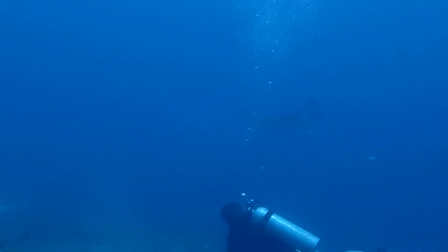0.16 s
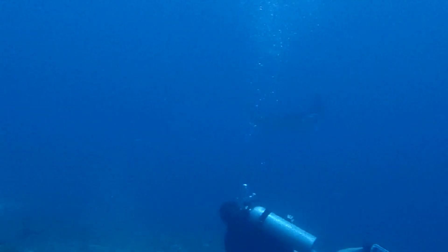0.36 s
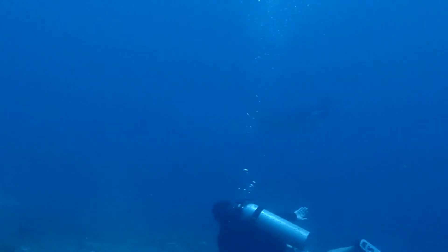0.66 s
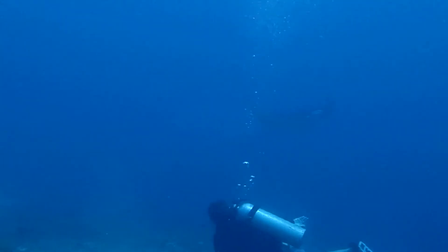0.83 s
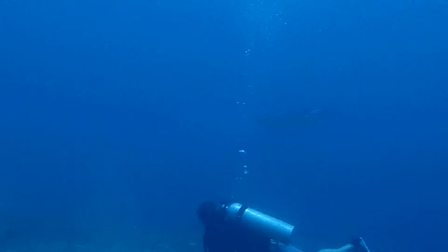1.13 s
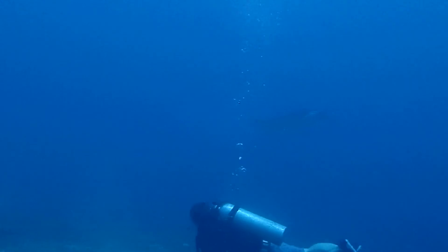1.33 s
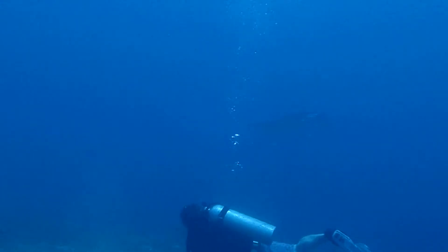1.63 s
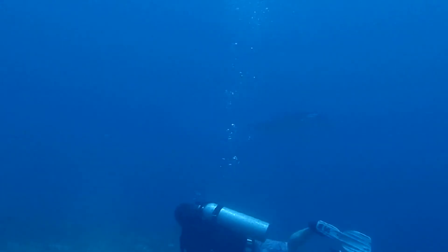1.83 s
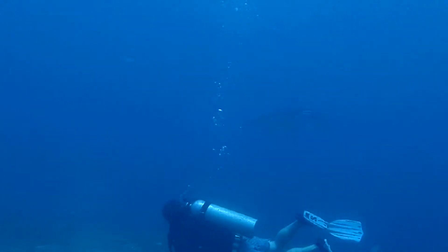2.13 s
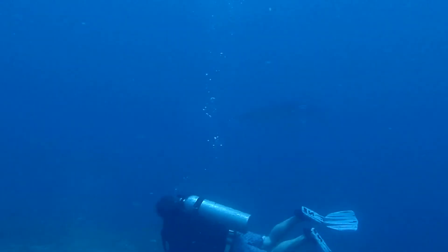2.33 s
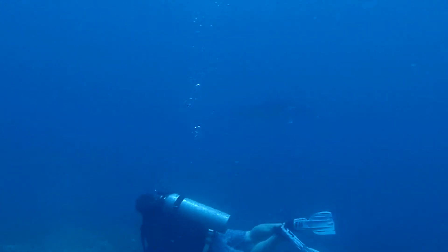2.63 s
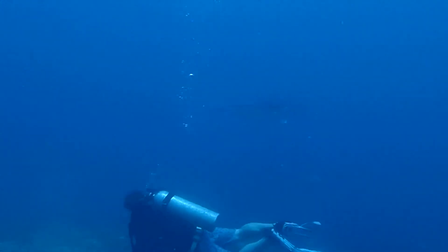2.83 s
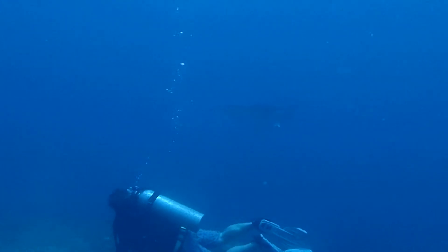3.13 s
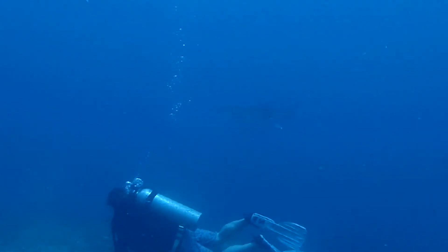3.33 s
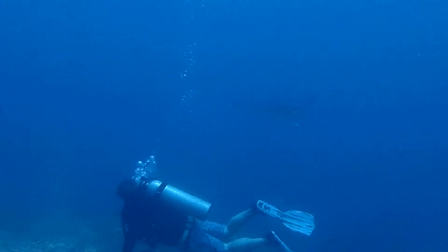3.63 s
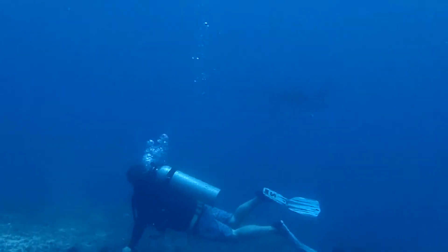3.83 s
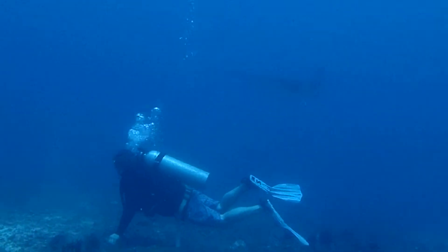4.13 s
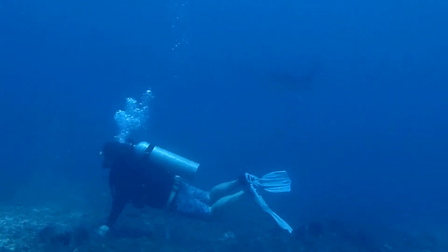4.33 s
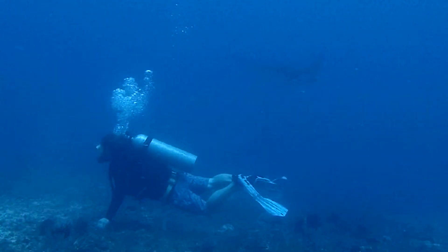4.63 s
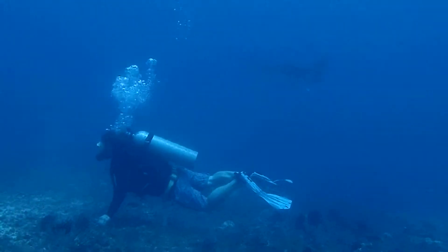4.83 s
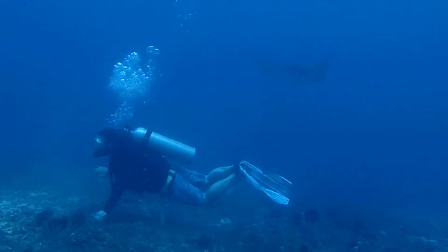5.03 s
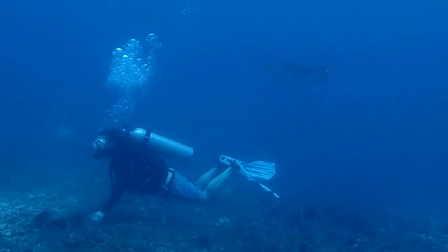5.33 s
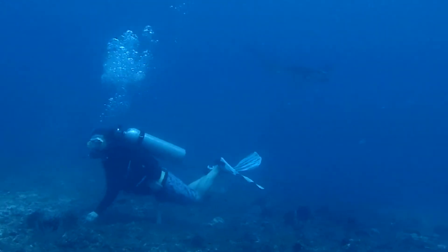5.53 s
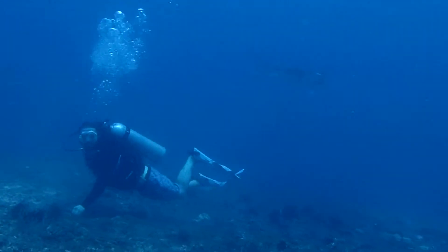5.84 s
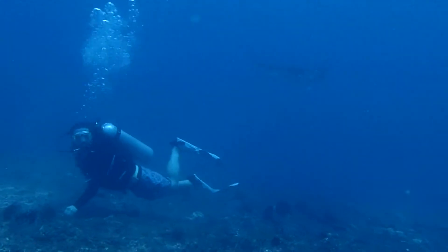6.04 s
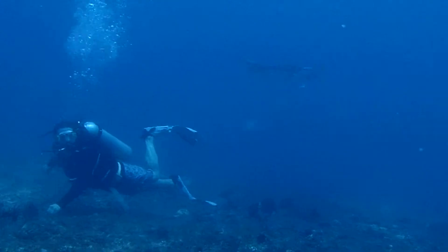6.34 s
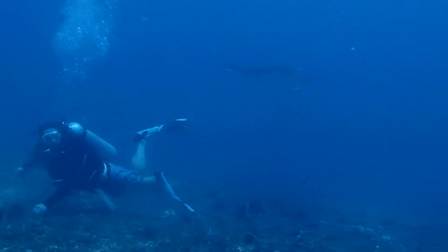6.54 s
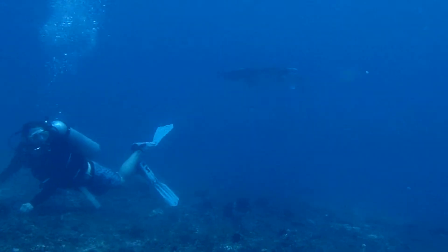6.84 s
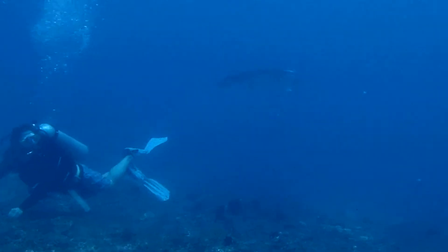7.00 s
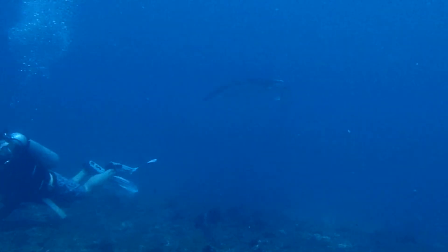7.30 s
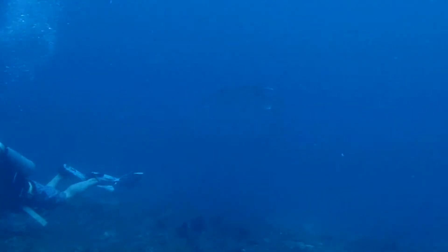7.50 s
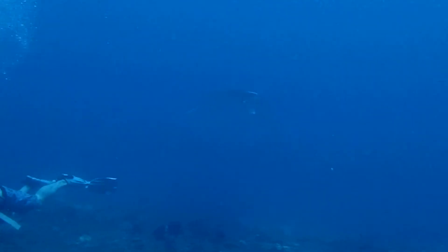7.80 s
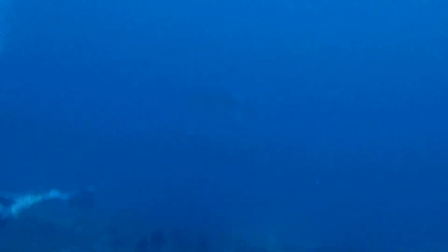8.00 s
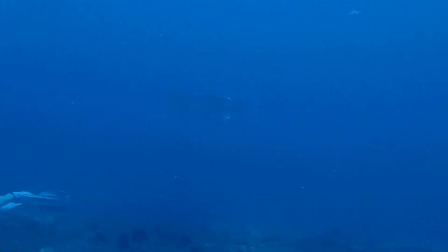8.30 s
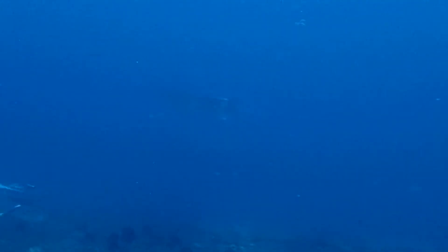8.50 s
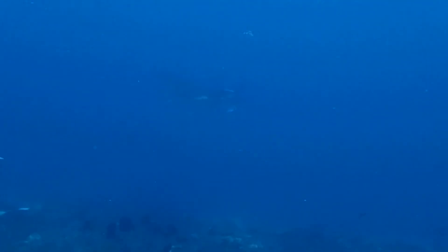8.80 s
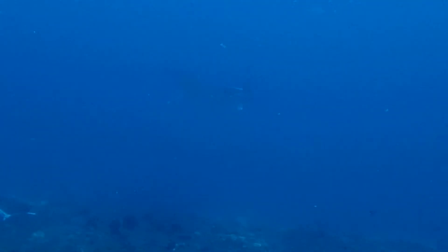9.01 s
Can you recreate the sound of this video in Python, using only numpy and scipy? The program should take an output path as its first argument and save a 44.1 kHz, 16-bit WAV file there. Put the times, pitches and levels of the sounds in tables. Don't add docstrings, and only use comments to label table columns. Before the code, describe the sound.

Underwater in a camera housing, a distant boat engine drones and throbs away, with bubble pings, low bumps, hard knocks on the case and late crackling snaps.

```python
import sys
import numpy as np
from scipy import signal
from scipy.fft import rfft, irfft, next_fast_len
from scipy.io import wavfile
from scipy.ndimage import uniform_filter1d

SR = 44100
rng = np.random.default_rng(int(sys.argv[2]) if len(sys.argv) > 2 else 0)


def transcribe(signal):
    frames = np.atleast_2d(signal).T
    limited = np.clip(frames, -1, 1)
    pcm = np.round(limited * 32767).astype(np.int16)
    wavfile.write(sys.argv[1], SR, pcm)


def decibels_to_gain(level_db):
    exponent = np.asarray(level_db, float) / 20
    return 10 ** exponent


N = 403956

# time in seconds, turns made so far.
SHAFT_TURNS = [(0, .1), (2.8, 46.25), (6.1, 101.18), (6.5, 107.74), (8, 131.92), (9.16, 150.85)]
LOAD_S, LOAD_LENGTH_S = 6.17, 0.64


def evened(x):
    return x / np.sqrt(np.mean(x ** 2) + 1e-20)


def read(points, hz):
    f, value = np.transpose(points)
    return np.interp(np.log(hz + 1), np.log(f + 1), value)


def curve(rows, t):
    s, *columns = np.transpose(rows)
    return np.array([np.interp(t, s, c) for c in columns])


def add(mix, s, sound):
    part = mix[..., round(s * SR):][..., :sound.shape[-1]]
    part += sound[..., :part.shape[-1]]


def ring(db, hz, rise, t60, glide):
    t = np.arange(round((rise + t60) * SR)) / SR
    pitch = hz * glide ** (t / t[-1])
    swell = np.sin(np.pi / 2 * np.minimum(t / rise, 1)) ** 2
    decay = decibels_to_gain(db - 60 * np.maximum(t - rise, 0) / t60)
    return decay * swell * np.sin(2 * np.pi * np.cumsum(pitch) / SR)


def step(t, middle_s, length_s):
    return np.sin(np.pi / 2 * np.clip((t - middle_s) / length_s + .5, 0, 1)) ** 2


def course(rows, t, drift):
    swing = step(t, 3.7, 2.6)
    load = step(t, LOAD_S, LOAD_LENGTH_S)
    return np.array(rows) @ np.array([np.ones(len(t)), drift, swing, load])


def roar(colour_db, patchy_db, size=512):
    # low edge in Hz, high edge in Hz.
    bands = [(100, 250), (350, 600), (900, 1500), (3300, 4600), (5000, 9000)]
    # time in seconds, path loss as a level in dB.
    path = [(0, 1.5), (.3, -4), (.64, -5), (1.15, -5), (1.63, -8), (2.5, -6.5), (3.47, -9), (4.1, -9),
            (5.9, -10), (6.5, -9.5), (7.8, -11.5), (9.16, -12)]
    # start in dB, share of the path loss, dB as the stern swings away, dB under load.
    layers = [
        (-39.5, 0.34, -1.5, -2),
        (-26, 1, 2, 0.5),
        (-39.5, 0.27, -5, 0),
        (-64.5, 0.14, -1, -1),
        (-47.5, 0.32, 0.5, -1.5),
    ]
    hop = size // 4
    hz = np.fft.rfftfreq(size, 1 / SR)
    frames = N // hop + 5
    t = np.arange(frames) * hop / SR

    fine_hz = np.arange(1., SR / 2)
    passed = np.sqrt(housing_power(fine_hz)).mean(axis=0) ** 2 / (SR / 2)
    passed_db = np.array([10 * np.log10(passed[lo:hi].sum()) for lo, hi in bands])
    water_db = course(layers, t, curve(path, t)[0]) - passed_db[:, None]

    centres = np.log([np.sqrt(lo * hi) for lo, hi in bands])
    blend = np.array([np.interp(np.log(hz + 1), centres, row) for row in np.eye(len(bands))])
    patches = uniform_filter1d(rng.standard_normal((frames, len(hz))), 24, 0)
    patches = evened(uniform_filter1d(patches, 8, 1))
    field_db = water_db.T @ blend + colour_db(hz) + patchy_db * patches
    real, imaginary = rng.standard_normal((2, frames, 2, len(hz)))
    spectrum = (real + 1j * imaginary) * decibels_to_gain(field_db)[:, None]
    spectrum = np.transpose(spectrum, (1, 2, 0))
    noise = signal.istft(spectrum, nperseg=size, noverlap=size - hop)[1]
    return noise[:, :N] / np.sqrt(size / 3)


def throb(fade_turns=.2, jitter_turns=.03, uneven_db=2.2):
    t = np.arange(N) / SR
    halves = 2 * curve(SHAFT_TURNS, t)[0]
    which = halves.astype(int)
    luck = rng.standard_normal((int(halves[-1]) + 2, 2))
    since = (halves % 1) / 2 - jitter_turns * abs(luck[which, 1])
    load = step(t, LOAD_S, LOAD_LENGTH_S)
    whole_turn_db = -12 + 9 * load
    half_turn_db = -7.5 + 1 * load
    level_db = np.where(which % 2 == 0, whole_turn_db, half_turn_db) + uneven_db * luck[which, 0]
    return uniform_filter1d(decibels_to_gain(level_db) * np.exp(-since / fade_turns) * (since > 0), size=260)


def hum(waver_db=1.5):
    orders = (8, 10, 27)
    # start in dB, drift in dB a second, dB after the swing, dB under load.
    tones = [
        (-47.5, -1, 10, -12),
        (-49, -.7, -1, -6),
        (-38, -.9, 1.5, -4),
    ]
    t = np.arange(N) / SR
    slow = evened(uniform_filter1d(rng.standard_normal((120, len(orders))), size=3, axis=0))
    waver = curve(np.c_[np.linspace(0, t[-1], len(slow)), slow], t)
    turns = np.outer(orders, curve(SHAFT_TURNS, t)[0])
    level_db = course(tones, t, t) + waver_db * waver
    return np.sqrt(2) * (decibels_to_gain(level_db) * np.sin(2 * np.pi * turns)).sum(axis=0)


def snaps(boost_db=40, treble_db=-7, rise_share=0.043):
    # time in seconds, peak in dB, t60 in seconds.
    large = [(6.336, -50, .03), (6.3737, -36, 0.014), (6.3947, -42, .04), (6.465, -40, 0.038),
             (6.497, -39, .012), (6.517, -44, .045), (6.5816, -35.5, .05), (6.6372, -38.5, 0.067),
             (6.702, -38.5, 0.049), (7.0745, -37, .035), (7.3886, -35, .03), (7.633, -34, 0.028),
             (7.692, -32.5, .035), (7.8123, -39, 0.041), (7.8434, -42, .015), (8.2706, -49, .02),
             (8.368, -41, 0.041), (8.4164, -37, .012), (8.4257, -35, .02), (8.4754, -43, .015),
             (8.489, -35, .03), (8.5, -39, .03), (8.5205, -33, .015), (8.5604, -35, .02),
             (8.585, -34, 0.036), (8.6133, -39, 0.036), (8.9194, -33, .025), (9.1217, -35, 0.023)]
    first_turn, clear_s = 100, .03
    out = np.zeros((2, N))
    t = np.arange(2000) / SR
    body = signal.butter(2, (1500, 7000), "band", fs=SR)
    treble = signal.butter(2, (4900, 10000), "band", fs=SR)

    times, turns = np.transpose(SHAFT_TURNS)
    beats = np.interp(np.arange(first_turn, int(turns[-1])), turns, times)
    late, strength = rng.standard_normal((2, len(beats)))
    small = np.c_[beats + .003 * late, -46 + 3 * strength, np.full(len(beats), .045)]
    clear = abs(beats[:, None] - np.transpose(large)[0]).min(axis=1) > clear_s
    for s, db, t60 in np.vstack([small[clear], large]):
        swell = np.minimum(t / (rise_share * t60), 1)
        puff = rng.standard_normal((2, len(t))) * swell * decibels_to_gain(db + boost_db - 60 * t / t60)
        add(out, s - .001, signal.lfilter(*body, puff) + decibels_to_gain(treble_db) * signal.lfilter(*treble, puff))
    return out


def knocks():
    # time in seconds, peak in dB, main ring in Hz, ring t60 in seconds, treble tick in dB.
    blows = [
        (2.288, -14, 1170, 0.032, -17),
        (2.376, -14, 1135, 0.02, -27),
        (7.571, -12.5, 1150, 0.02, -26),
        (8.013, -.5, 1085, 0.015, -24.5),
    ]
    # ratio to the main ring, level in dB.
    modes = [(.86, -7), (1, 4), (1.28, -9), (1.55, -10), (1.8, -14.5)]
    ticks = ((2900, -8), (3700, -11.5), (5400, 0.5), (5900, -4.5), (7800, -12))  # Hz, dB
    out = np.zeros(N)
    for s, db, hz, t60, tick_db in blows:
        for ratio, mode_db in modes:
            strike = ring(db + mode_db - 11.0, hz * ratio, 0.0023, t60, 0.81)
            rebound = ring(db + mode_db - 19.0, 0.883 * hz * ratio, 0.0027, t60, 1.0)
            add(out, s - .0015, strike)
            add(out, s + 0.00417, rebound)
        for tick_hz, lift_db in ticks:
            add(out, s - .0002, ring(db + tick_db + lift_db - 4.5, tick_hz, 0.0016, 0.021, 0.97))
    return out


def bubbles():
    # time in seconds, peak in dB, pitch in Hz, rise in seconds.
    pings = [
        (.19, -40, 8000, .001),
        (1.632, -38, 7870, .001),
        (2.535, -39, 7900, .001),
        (2.7328, -27.5, 7920, .0015),
        (4.3135, -27.5, 7980, .0045),
        (4.3125, -40, 9460, .001),
        (4.3125, -40, 2870, .003),
    ]
    # time in seconds, peak in dB, pitch in Hz, t60 in seconds, glide ratio.
    bumps = [
        (.843, -24, 300, .06, 1.5),
        (.868, -25.5, 176, 0.1, 1.5),
        (0.877, -23, 251, .05, 1.3),
        (.893, -23, 272, .05, 1.7),
        (0.909, -28, 300, 0.046, 1.3),
        (1.82, -24.5, 552, 0.086, 0.71),
        (2.44, -25, 507, 0.036, 0.99),
        (2.524, -21.5, 198, 0.046, 0.81),
        (2.528, -18.5, 320, 0.025, .83),
        (8.007, -42, 1130, .021, 1.3),
    ]
    # time in seconds, peak in dB, pitch in Hz, rise in seconds, t60 in seconds.
    moans = [
        (0, -25, 227.6, 0.0041, .62),
        (5.621, -30, 531, 0.095, 0.45),
    ]
    out = np.zeros(N)
    for s, db, hz, rise in pings:
        add(out, s, ring(db, hz, rise, 89 / hz, 0.96))
    for s, db, hz, t60, glide in bumps:
        add(out, s, ring(db, hz, 0.0048, t60, glide))
    for s, *tone in moans:
        add(out, s, ring(*tone, 0.94))
    return out


def crackle(per_s=60, spread_db=-1.0, level_db=-28):
    size_db = level_db + spread_db * np.minimum(rng.exponential(1, N), 4)
    clicks = decibels_to_gain(size_db) * (rng.random(N) < per_s / SR) * rng.choice([-1, 1], N)
    return np.diff(clicks, prepend=0) * np.ones((2, 1))


def housing_power(hz):
    # centre in Hz, width in Hz, left level in dB, right level in dB.
    resonances = [(69, 99, -23, -28), (134, 44, -16, -21), (169, 57, -12, -15.5), (226, 90, -20, -19),
                  (320, 334, -15, -20.5), (467.6, 50, -2, -0.5), (449.5, 135, -6, -8.5),
                  (564, 350, -18.5, -46), (894, 148, -19.5, -27.5), (1100, 103, -11.5, -16.5),
                  (1191, 73, -12, -19), (1399, 182, -18.5, -23), (1640, 99, -33, -33.5),
                  (1937, 64, -22.5, -32.5), (2024, 220, -33.5, -33.5), (2764, 850, -36.5, -42),
                  (3230, 370, -51, -45), (3530, 300, -43, -43.5), (3920, 440, -53, -59),
                  (4450, 440, -37, -42), (5340, 400, -22.5, -34), (5600, 300, -27, -28),
                  (5990, 660, -31.5, -34), (6162, 51, -26, -29.5), (6730, 820, -32.5, -34),
                  (7825, 680, -31, -33.5), (8500, 1100, -39, -41.5), (9570, 1350, -40, -42),
                  (11260, 940, -38, -43.5), (13600, 2800, -42.5, -46)]
    # centre in Hz, width in Hz, share of power lost.
    notches = [(4832, 140, .998), (3400, 90, .9), (5870, 60, .6), (5180, 40, .5), (2300, 80, .4)]
    f, width, *db = np.transpose(resonances)[:, :, None]
    shape = 1 / (1 + ((hz ** 2 - f ** 2) / ((hz + 1) * width)) ** 2) ** 2
    power = (decibels_to_gain(np.array(db)) ** 2 * shape).sum(axis=1)
    for f, width, share in notches:
        power = power * (1 - min(share, .999) / (1 + ((hz - f) / width) ** 2))
    return power + 1e-9


def housing(water):
    # frequency in Hz, share in common.
    likeness = [(30, 0.48), (70, 0.51), (120, 1), (200, 0.89), (500, 1), (680, 0.78), (1200, 1),
                (2150, 0.63), (3000, 0.96), (5500, 0.53), (9000, 0.25), (15000, .3)]
    # frequency in Hz, phase lead in radians.
    lead = [(1500, 0.12), (4500, -0.5), (5500, 0.32), (9000, 0.056), (13000, -1)]
    taps_count = 4096
    size = next_fast_len(N + 2 * taps_count)
    log_gain = np.log(housing_power(abs(np.fft.fftfreq(2 * taps_count, 1 / SR)))) / 2
    taps = np.fft.ifft(np.exp(np.conj(signal.hilbert(log_gain)))).real[:, :taps_count]
    hz = np.fft.rfftfreq(size, 1 / SR)
    already = np.pad(water, ((0, 0), (taps_count, 0)), "reflect")
    a, b = rfft(already, size)
    same = np.clip(read(likeness, hz), 0, 1)
    right = (same * a + np.sqrt(1 - same ** 2) * b) * np.exp(-1j * read(lead, hz))
    return irfft(np.array([a, right]) * rfft(taps, size), size)[:, taps_count:taps_count + N]


def scene():
    # frequency in Hz, level in dB.
    burst_colour = [(100, -9), (450, 0), (1200, 7), (2800, 12), (4000, 7.5), (6000, 8), (9000, 8),
                    (15000, 3)]
    steady = roar(lambda hz: -1.5, patchy_db=0.94)
    bursts = throb() * roar(lambda hz: read(burst_colour, hz), patchy_db=2.5)
    water = steady + bursts + snaps() + crackle()
    case = hum() * decibels_to_gain([[1.7], [-2.2]])
    case = case + knocks() * decibels_to_gain([[2.3], [-3.3]])
    case = case + bubbles() * decibels_to_gain([[1.2], [-1.6]])
    return housing(water) + case


def preamplifier():
    # whine pitch in Hz, level in dB.
    whine_tones = [(15336, -84), (15396, -85)]
    t = np.arange(N) / SR
    hiss = rng.standard_normal((N, 2)).T * decibels_to_gain([[-56.5], [-57]])
    hiss = signal.lfilter(*signal.butter(6, 8000, "high", fs=SR), hiss)
    whine = sum(np.sqrt(2) * decibels_to_gain(db) * np.sin(2 * np.pi * hz * t) for hz, db in whine_tones)
    return hiss + whine * decibels_to_gain([[-5.], [1.]])


def gain_control(x):
    power_db = 10 * np.log10(abs(uniform_filter1d((x ** 2).mean(0), size=200)) + 1e-12)
    fall = np.arange(N) / SR * 22.
    held_db = np.maximum.accumulate(power_db + fall) - fall
    over_db = np.maximum(held_db + 20, 0)
    return x / decibels_to_gain(.76 * uniform_filter1d(over_db, size=700, origin=349))


def band_limit(x):
    return signal.sosfilt(signal.butter(12, 15690, fs=SR, output="sos"), x)


def record(dry):
    ducked = gain_control(dry + preamplifier())
    edge = signal.firwin(511, 15800, window=("kaiser", 9), fs=SR)
    return band_limit(signal.oaconvolve(ducked, edge[None], "same"))


dry = scene()
out = record(dry)
transcribe(out)
```